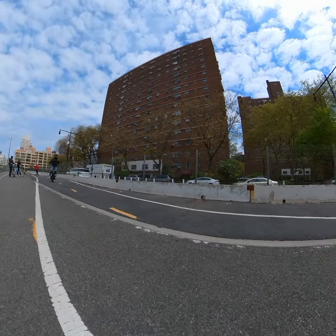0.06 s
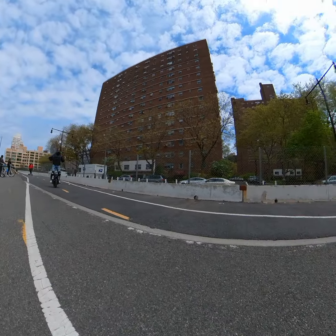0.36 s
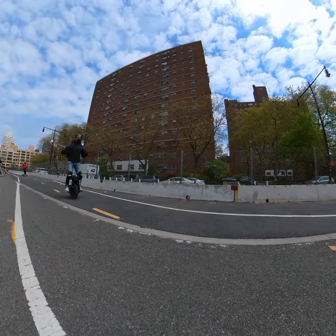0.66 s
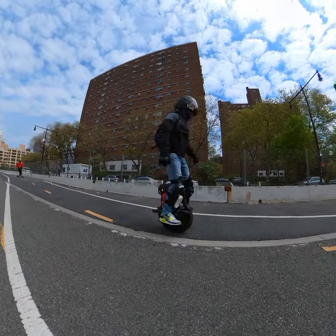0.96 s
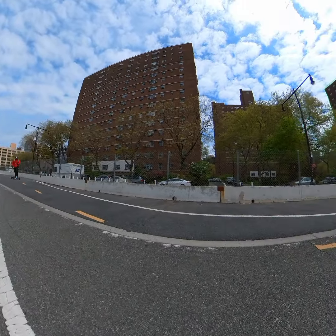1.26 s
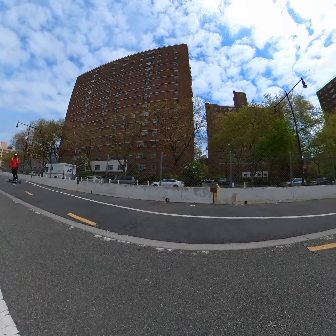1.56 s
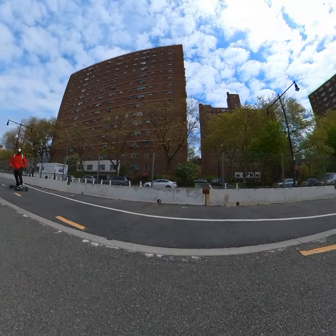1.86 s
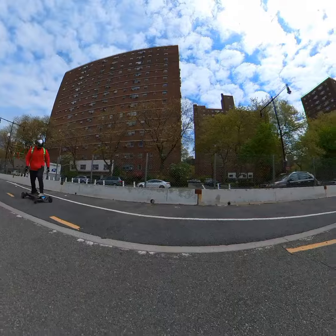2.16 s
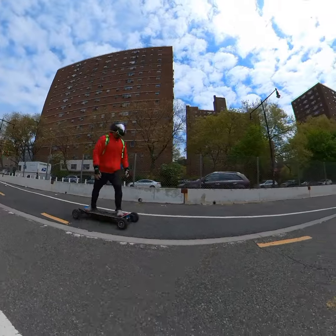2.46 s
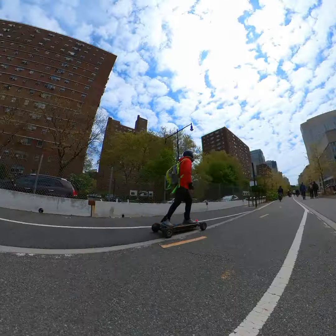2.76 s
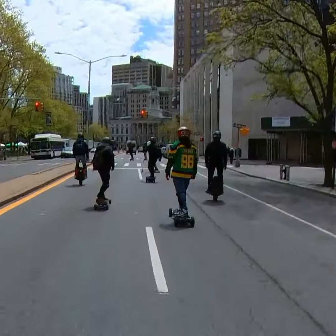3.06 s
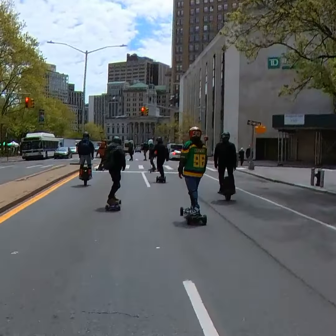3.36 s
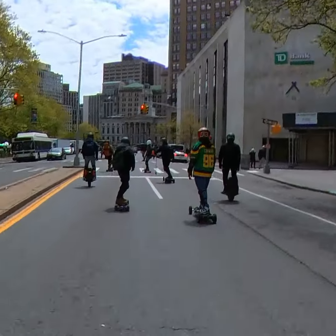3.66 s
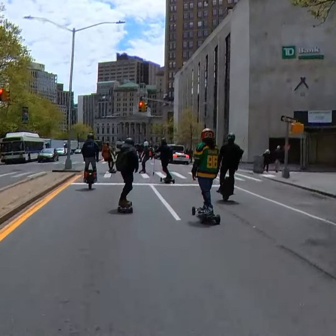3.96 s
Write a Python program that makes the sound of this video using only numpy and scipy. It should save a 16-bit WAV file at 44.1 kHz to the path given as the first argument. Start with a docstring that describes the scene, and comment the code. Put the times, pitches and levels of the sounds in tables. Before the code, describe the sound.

An electric unicycle hums past over rumbling city traffic, then an electric skateboard whirrs by on rough asphalt. The sound switches abruptly to a moving ride: clattering jolts, rumbling wheels and muffled wind surging on the microphone.

```python
"""Beside a city bike lane, traffic rumbles, a departing rider's tyres hiss and eddies thud on the
microphone. An electric unicycle hums past, its tread tone sinking by the Doppler effect, amid brief
whines and the tick of a stone. An electric skateboard follows, gears whirring, its deck rung by coarse
asphalt. The sound then switches abruptly to a ride among the group: a short clatter of jolts, wheel
rumble and a thin hiss of air under muffled, surging wind."""
import sys
import numpy as np
from scipy import signal
from scipy.fft import rfft, irfft
from scipy.io import wavfile
from scipy.ndimage import uniform_filter1d, minimum_filter1d

SR = 44100
rng = np.random.default_rng(int(sys.argv[2]) if len(sys.argv) > 2 else 0)


def store_wav(level_fs):
    """Save 16-bit WAV to argv[1]."""
    pcm = np.round(np.clip(np.atleast_2d(level_fs), -1, 1) * 32767)
    wavfile.write(sys.argv[1], SR, pcm.T.astype(np.int16))


N = 176400
T = np.arange(N) / SR


def from_db(db):
    """Amplitude ratio of a level in decibels."""
    return 10 ** (np.asarray(db) / 20)


def rms_one(x):
    """Normalisation to unit power."""
    return x / np.sqrt(np.mean(x ** 2) + 1e-20)


def in_time(rows):
    """Linear interpolation of (seconds, value) rows."""
    return np.interp(T, *np.transpose(rows))


def at_hz(rows, hz):
    """Interpolation of (Hz, value) rows in log frequency."""
    row_hz, value = np.transpose(rows)
    return np.interp(np.log(hz), np.log(row_hz), value)


def lowpass(order, edge_hz):
    """Butterworth low-pass sections."""
    return signal.butter(order, edge_hz, fs=SR, output="sos")


def bump(at_s, half_s):
    """Gaussian envelope of height 1."""
    return np.exp(-((T - at_s) / half_s) ** 2)


def drift(rate_hz):
    """Low-passed random fluctuation of unit power."""
    step = 40   # samples between random values
    pole = np.exp(-2 * np.pi * rate_hz * step / SR)
    white = rng.standard_normal(N // step + 2002)
    slow = signal.lfilter([1], [1, -2 * pole, pole * pole], white)[2000:]
    return np.interp(np.arange(N) / step, np.arange(len(slow)), rms_one(slow))


def flutter(rate_hz, depth_db):
    """Random amplitude modulation of unit power."""
    return rms_one(from_db(depth_db * drift(rate_hz)))


def evened(x, window_s):
    """Division by the running rms holds a signal at a steady level."""
    power = np.abs(signal.hilbert(np.atleast_2d(x).mean(axis=0))) ** 2
    return x / np.sqrt(uniform_filter1d(power, int(window_s * SR)) / 2 + 1e-9)


def rough_tone(hz, width_hz):
    """Random quadrature modulation spreads a tone into a narrow band."""
    phase = 2 * np.pi * np.cumsum(hz) / SR
    return drift(width_hz) * np.cos(phase) + drift(width_hz) * np.sin(phase)


def passing(nearest_s, span_s, db=0):
    """Inverse-distance law for a source that travels its nearest distance in span_s."""
    return from_db(db) / np.hypot(1, (T - nearest_s) / span_s)


# Stereo width. Each row: frequency in Hz, side relative to mid in dB.
STEREO_WIDTH = [(1900, -72), (2400, -48.5), (2900, -54), (3200, -4), (5500, -7.5), (7500, -29.5)]

def noise(spectrum, width_db=0):
    """Spectrally shaped noise of unit power, wide only in the treble."""
    hz = np.maximum(np.fft.rfftfreq(N, 1 / SR), 1)
    octaves_outside = np.abs(np.log2(hz / np.clip(hz, spectrum[0][0], spectrum[-1][0])))
    gain = from_db(at_hz(spectrum, hz) - 36 * octaves_outside)
    mid, side = rfft(rng.standard_normal((2, N))) * gain
    side = side * from_db(at_hz(STEREO_WIDTH, hz) + width_db)
    return rms_one(irfft([mid + side, mid - side], N))


# Spectra of the city and of receding tyres. Each row: frequency in Hz, relative density in dB.
CITY_SPECTRUM = [(22, -12), (45, 2.5), (90, 4), (150, -0.5), (240, 0.5), (320, -5.5), (420, -4),
                 (540, -7.5), (720, -8.5), (970, -11.5), (1120, -14.5), (1500, -18.5), (2200, -25.5),
                 (2750, -30), (3400, -33), (4600, -33.5), (5800, -44.5), (6800, -49.5), (8000, -58),
                 (9200, -70.5)]
DEPARTING_SPECTRUM = [(1500, 1), (2200, -9), (2550, 1.5), (2900, 0.5), (3400, -9), (4400, -14), (5200, -12),
                      (6800, -14.5), (8000, -25.5), (9300, -41)]
# Swell of the city rumble. Each row: time in seconds, gain in dB.
CITY_GAIN = [(0, 1), (.35, .5), (.8, 0), (1.7, 0), (2.8, 1)]

def street():
    """Broadband noise: the city rumbles on while a rider's tyre hiss fades with distance."""
    city_db, departing_db, fade_db_per_s = -32.5, -44, 12.5
    city = from_db(city_db + in_time(CITY_GAIN)) * evened(noise(CITY_SPECTRUM), window_s=0.17)
    city = city * flutter(rate_hz=24, depth_db=0.6)
    return city + from_db(departing_db - fade_db_per_s * T) * noise(DEPARTING_SPECTRUM)


# Wind eddies. Each row: centre in seconds, half length in seconds, level in dB, upper edge in Hz.
EDDIES = [(0.563, 0.015, -22.5, 129), (0.671, 0.04, -27.5, 106), (1.405, 0.024, -31, 69),
          (1.505, 0.011, -28.5, 170), (2.111, 0.032, -31, 101), (2.424, 0.037, -26.5, 120),
          (2.483, 0.022, -20.5, 72), (2.572, 0.016, -18.5, 105), (2.763, 0.017, -25.5, 260),
          (3.224, 0.011, -23, 140), (3.457, 0.022, -20, 127), (3.744, 0.031, -19, 168),
          (3.823, 0.042, -25.5, 190)]

def eddies():
    """Turbulent pressure: each eddy striking the microphone gives a low thud."""
    thuds = 0
    for at_s, half_s, db, hz in EDDIES:
        spectrum = [(hz / 5, -9), (hz / 2, 0), (hz, 0), (hz * 2, -17), (hz * 10, -55)]
        thuds += from_db(db) * bump(at_s, half_s) * evened(noise(spectrum), window_s=0.03)
    return thuds


# Rolling noise of one big tyre. Each row: frequency in Hz, relative density in dB.
UNICYCLE_SPECTRUM = [(90, -5), (230, 5.5), (320, 0), (520, -4), (700, -3), (1080, -13), (1350, -9.5),
                     (2000, -18.5), (2900, -24), (3600, -32), (5500, -33.5), (6500, -38), (8500, -57)]
# Swell of the tread hum. Each row: time in seconds, gain in dB.
HUM_GAIN = [(.70, -31), (.86, 1), (1.0, -7), (1.2, -1.5), (1.36, -15.5), (1.55, -18)]

def unicycle():
    """Doppler shift lowers the tread hum; directivity beams the tyre's rush mostly sideways."""
    nearest_s, span_s = 1.11, 0.22
    hum_hz, hum_db, doppler_share = 409.6, -33, 0.0178
    position = (T - nearest_s) / span_s
    tread = rough_tone(hum_hz * (1 - doppler_share * np.tanh(position)), width_hz=6.5)
    hum = from_db(hum_db + in_time(HUM_GAIN)) * evened(tread, window_s=0.17)
    directivity = np.cos(np.arctan(position)) ** 0.87
    rush = noise(UNICYCLE_SPECTRUM) * flutter(rate_hz=68, depth_db=2.5)
    return hum + directivity * passing(nearest_s, span_s, db=-30) * rush


# Brief whines. Each row: centre in seconds, half length in seconds, pitch in Hz, width in Hz, level in dB.
WHINE_BANDS = [(0.97, .03, 1330, 53, -42.5), (1.14, 0.035, 1370, 36, -45), (1.15, .08, 750, 49, -40),
               (1.145, 0.1, 6470, 29, -63), (1.367, 0.0089, 445, 9.5, -30), (1.833, 0.077, 4600, 64, -60),
               (2.187, 0.034, 978, 25, -40), (2.245, 0.049, 4520, 40, -60), (2.43, 0.075, 4920, 30, -53),
               (2.692, 0.014, 2800, 35, -40.5), (2.733, 0.015, 950, 17, -35), (2.755, 0.031, 4680, 25, -51),
               (2.78, 0.019, 2790, 53, -40.5), (2.788, 0.013, 1890, 27, -45), (2.803, 0.02, 4000, 12, -54)]

def whines():
    """Narrow-band noise: motors, wheels and tyres sing out briefly at a sinking pitch."""
    sag_share_per_s, singing = 0.15, 0
    for at_s, half_s, hz, width_hz, db in WHINE_BANDS:
        tone = rough_tone(hz * (1 - sag_share_per_s * (T - at_s)), width_hz)
        singing += from_db(db) * bump(at_s, half_s) * evened(tone, window_s=0.052)
    return singing


# Stones spat out by the tyres. Each row: time in seconds, level in dB.
STONE_TICKS = [(1.048, -50), (2.54, -40)]

def stones():
    """Brief impacts have broad spectra: each small stone gives a bright tick."""
    envelope = sum(from_db(db) * bump(at_s, half_s=0.0056) for at_s, db in STONE_TICKS)
    return envelope * noise([(2000, -5), (4500, 9), (7000, -12), (9000, -31)])


BOARD_NEAREST_S, BOARD_SPAN_S = 2.85, 0.25
# Rolling noise of small tyres. Each row: frequency in Hz, relative density in dB.
BOARD_SPECTRUM = [(90, -6), (220, -0.5), (320, -2.5), (420, -3.5), (600, -8), (950, -7), (1250, -17),
                  (2000, -15), (3500, -22.5), (4600, -19), (5700, -25), (7500, -26), (8500, -36.5),
                  (9600, -55)]

def skateboard_tyres():
    """Spherical spreading sets the level of the roar; its treble falls off faster with distance."""
    nearness = passing(BOARD_NEAREST_S, BOARD_SPAN_S)
    roar = from_db(-30) * nearness * noise(BOARD_SPECTRUM) * flutter(rate_hz=53, depth_db=2)
    low = signal.sosfiltfilt(lowpass(2, 5500), roar)
    return low + (roar - low) * nearness


def board_doppler():
    """Doppler shift: the skateboard's pitch as a share of its pitch on approach."""
    return 1 - 0.015 * (1 + np.tanh((T - BOARD_NEAREST_S) / BOARD_SPAN_S))


# Modes of deck and trucks. Each row: frequency in Hz, bandwidth in Hz, relative level in dB.
DECK_MODES = [(229, 32, -11.5), (430, 81, -2.5), (898, 110, -1.5), (1890, 250, -3.5), (2880, 120, -4),
              (3920, 80, -15.5), (4500, 450, -23), (6480, 340, -10.5)]
# Rough asphalt. Each row: centre in seconds, half length in seconds, rise in dB.
ROUGH_PATCHES = [(2.424, 0.028, 11.5), (2.545, 0.016, 8), (2.667, 0.013, 7)]

def skateboard_deck():
    """Modal resonance: grit rings deck and trucks, whose pitch sinks in passing and wavers with load."""
    grit_per_s, waver_share = 2300, 0.004
    grit = rng.random(N) < grit_per_s / SR
    ringing = 0
    for hz, width_hz, db in DECK_MODES:
        radius = np.exp(-np.pi * width_hz / SR)
        resonator = [1, -2 * radius * np.cos(2 * np.pi * hz / SR), radius * radius]
        steady = signal.lfilter([1, 0, -1], resonator, grit * rng.standard_normal((2, N)))
        warped_clock = np.cumsum(board_doppler() + waver_share * drift(rate_hz=8))
        mid, side = (np.interp(warped_clock, np.arange(N), ring) for ring in steady)
        side = side * from_db(at_hz(STEREO_WIDTH, hz))
        mode = rms_one(np.array([mid + side, mid - side]))
        ringing += from_db(db) * mode * flutter(rate_hz=20, depth_db=-0.6)
    ringing = rms_one(signal.sosfilt(lowpass(4, 7000), ringing))
    roughness = from_db(sum(db * bump(at_s, half_s) for at_s, half_s, db in ROUGH_PATCHES))
    return roughness * passing(BOARD_NEAREST_S, span_s=0.15, db=-40.5) * ringing


def skateboard_gears():
    """Harmonic series: the gears whirr on high partials that each waver and flare independently."""
    gear_hz, wander_hz, partials = 489.4, 95, 0
    for harmonic in range(4, 11):
        hz = harmonic * gear_hz * board_doppler() + wander_hz * drift(rate_hz=13)
        partial = np.sin(2 * np.pi * np.cumsum(hz) / SR) / harmonic
        partials += partial * flutter(rate_hz=16, depth_db=5.5)
    return passing(BOARD_NEAREST_S, span_s=0.27, db=-45) * evened(partials, window_s=0.16)


RIDE_WIDTH_DB = -13.5   # the ride has a narrower stereo image
# Wind while riding. Each row: frequency in Hz, relative density in dB.
WIND_SPECTRUM = [(60, -22), (130, -6.5), (210, 3), (380, -0.5), (550, -5.5), (750, -10.5), (1000, -17),
                 (1500, -31), (2200, -55.5), (3200, -62.5), (4500, -76)]
# Gust strength. Each row: time in seconds, level in dB.
GUST_LEVEL = [(2.84, -44), (2.93, -48), (3.12, -35), (3.19, -35), (3.30, -26), (3.46, -27), (3.51, -31),
              (3.60, -29.5), (3.69, -29), (3.74, -27.5), (3.83, -21.5), (3.90, -23.5), (3.94, -25),
              (4.0, -25)]

def headwind():
    """Turbulent flow noise grows louder and brighter as the wind surges."""
    gust_db = in_time(GUST_LEVEL)
    tilt_db_per_octave = 0.13 * (gust_db - gust_db.max())
    rush = evened(noise(WIND_SPECTRUM, RIDE_WIDTH_DB), window_s=0.039)
    wind = 0
    for octave, edge_hz in enumerate([300, 600, 1200]):
        band = signal.sosfiltfilt(lowpass(2, edge_hz), rush)
        wind += band * from_db(octave * tilt_db_per_octave)
        rush = rush - band
    treble = rush * from_db(2 * tilt_db_per_octave) * flutter(rate_hz=21, depth_db=4)
    return (wind + treble) * from_db(gust_db) * flutter(rate_hz=68, depth_db=1.5)


# Spectra of rumble and wheels. Each row: frequency in Hz, relative density in dB.
RUMBLE_SPECTRUM = [(20, -10), (40, -3.5), (70, -2), (110, -3.5), (180, -10), (300, -27), (700, -47)]
WHEEL_SPECTRUM = [(150, -1.5), (300, 3.5), (520, -0.5), (900, -13), (1600, -15), (2300, -24), (3200, -33),
                  (4000, -42.5), (4900, -60), (6000, -60.5), (9000, -73)]
# Their envelopes. Each row: time in seconds, level in dB.
RUMBLE_ENVELOPE = [(2.93, -33.5), (3.02, -24), (3.12, -31.5), (3.23, -27.5), (3.46, -22.5), (3.52, -27.5),
                   (3.68, -26.5), (4.0, -25)]
WHEEL_ENVELOPE = [(2.85, -37), (2.95, -37), (3.1, -41.5), (3.28, -35), (3.43, -35.5), (3.53, -41),
                  (3.8, -38.5), (4.0, -36.5)]

def rolling():
    """Rolling noise: a deep rumble lies under the fluttering rush of the wheels."""
    rumble = from_db(in_time(RUMBLE_ENVELOPE)) * evened(noise(RUMBLE_SPECTRUM), window_s=0.046)
    wheels = from_db(in_time(WHEEL_ENVELOPE)) * noise(WHEEL_SPECTRUM, RIDE_WIDTH_DB)
    return rumble + wheels * flutter(rate_hz=43, depth_db=1.65)


# Hiss of air. Each row: frequency in Hz, relative density in dB.
AIR_SPECTRUM = [(5000, -19.5), (5900, -7), (6600, 1.5), (7600, 1.5), (8300, -4), (9100, -25.5), (9800, -43)]
# Its envelope. Each row: time in seconds, level in dB.
AIR_ENVELOPE = [(2.94, -67.5), (3.06, -76), (3.2, -66), (3.45, -65), (3.50, -72.5), (3.58, -66.5),
                (3.76, -65.5), (4.0, -73.5)]

def air_hiss():
    """Band-limited noise: a thin hiss of air swells and dips."""
    return from_db(in_time(AIR_ENVELOPE)) * noise(AIR_SPECTRUM, RIDE_WIDTH_DB)


# Rattle of the microphone. Each row: frequency in Hz, relative density in dB.
RATTLE_SPECTRUM = [(100, -2.5), (350, 5.5), (570, -5), (850, -2), (1100, -6), (1450, -8.5), (1900, -18),
                   (2400, -24.5), (3000, -37), (4200, -72)]
# Jolts. Each row: start in seconds, level before filtering in dB, time constant in seconds, edge in Hz.
JOLT_CRACKS = [(2.844, -13, 0.0033, 3500), (2.962, -23, 0.003, 4020), (2.966, -14, 0.0037, 800),
               (2.974, -14.5, 0.0034, 3980), (2.993, -20, 0.011, 810), (3.007, -23, 0.0046, 1990),
               (3.015, -17.5, 0.0028, 4000), (3.022, -15.5, 0.0026, 2000), (3.030, -13, 0.0065, 2980),
               (3.042, -19.5, 0.0037, 3000), (3.048, -16.5, 0.0073, 3420), (3.061, -12.5, 0.0019, 2190)]
# Heavy knocks among them. Each row: start in seconds, initial envelope level in dB.
JOLT_THUMPS = [(2.841, -6.5), (2.976, -11), (3.06, -18.5)]

def jolts():
    """Damped vibration: jolts rattle the microphone, the heavy ones adding a low decaying sinusoid."""
    thump_hz, thump_t60_s = 83.6, 0.062
    rattle = evened(noise(RATTLE_SPECTRUM, RIDE_WIDTH_DB), window_s=0.004)
    cracks = thumps = 0
    for start_s, db, decay_s, edge_hz in JOLT_CRACKS:
        decay = (T >= start_s) * np.exp(-np.abs(T - start_s) / decay_s)
        envelope = from_db(db) * uniform_filter1d(decay, size=50)
        cracks += signal.sosfilt(lowpass(2, edge_hz), envelope * rattle + 1e-18)
    for start_s, db in JOLT_THUMPS:
        age_s = np.maximum(T - start_s, 0)
        thumps += from_db(db - 60 * age_s / thump_t60_s) * np.sin(2 * np.pi * thump_hz * age_s)
    return cracks + uniform_filter1d(thumps, size=40)


def scene():
    """Superposition: first the kerb, then the ride, with eddies on the microphone in both."""
    switch_s, crossfade_s = 2.829, 0.003
    riding = np.clip((T - switch_s) / crossfade_s + 0.5, 0, 1)
    kerb = street() + unicycle()
    kerb += skateboard_deck() + skateboard_tyres() + skateboard_gears()
    kerb += whines() + stones()
    ride = headwind() + rolling() + air_hiss() + jolts()
    return (1 - riding) * kerb + riding * ride + eddies()


def record(dry):
    """Peak limiting ducks the gain smoothly around loud peaks; a steep low-pass then cuts the top."""
    ceiling_db, window, stopband_hz = -9.5, int(0.0032 * SR), 10300
    gain = np.minimum(1, from_db(ceiling_db) / (np.abs(dry).max(axis=0) + 1e-9))
    held = minimum_filter1d(gain, 2 * window)
    smooth = uniform_filter1d(uniform_filter1d(held, window), window)
    return signal.sosfilt(signal.cheby2(12, 56, stopband_hz, fs=SR, output="sos"), dry * smooth)


dry = scene()
out = record(dry)
store_wav(out)
```